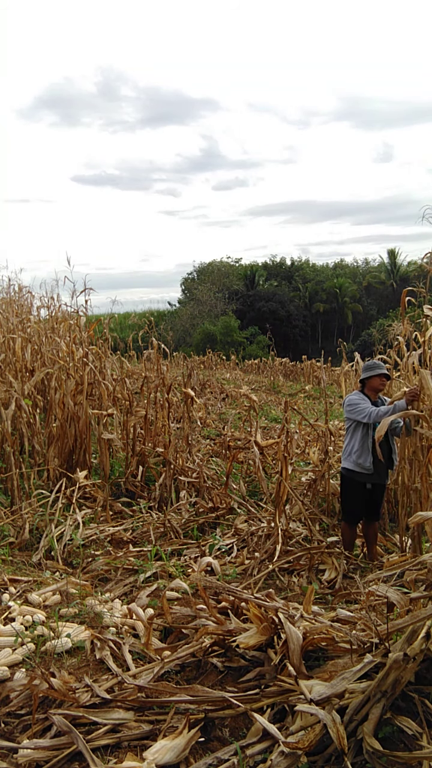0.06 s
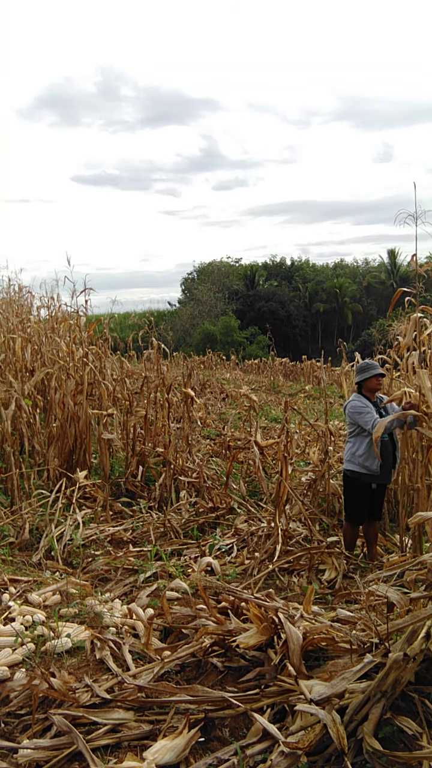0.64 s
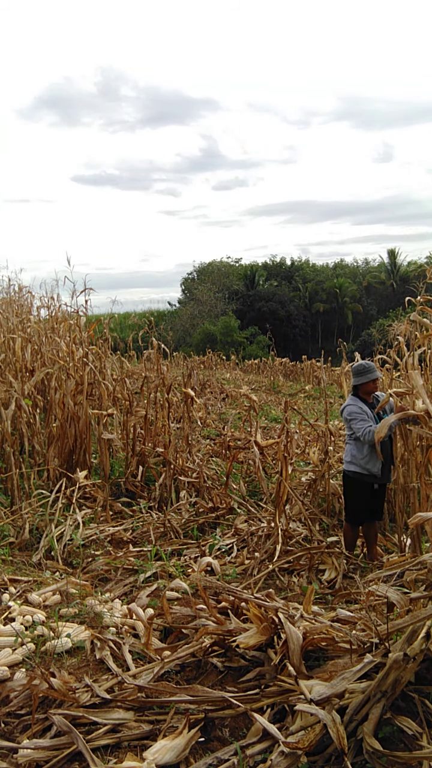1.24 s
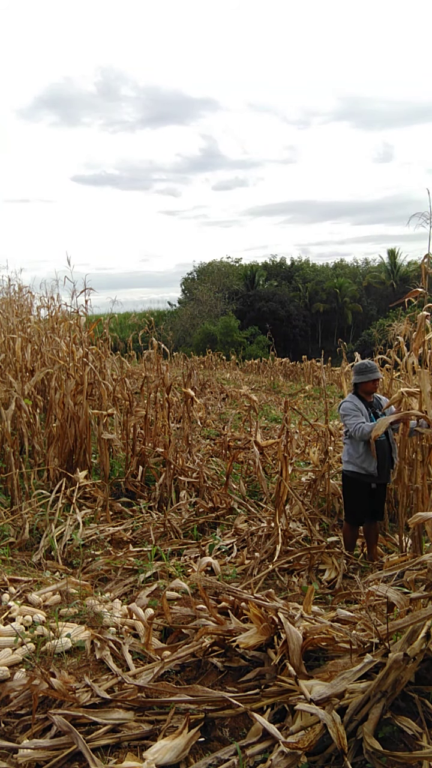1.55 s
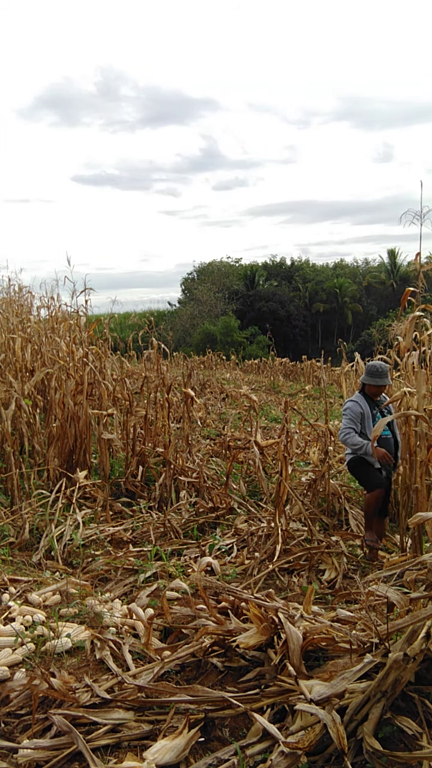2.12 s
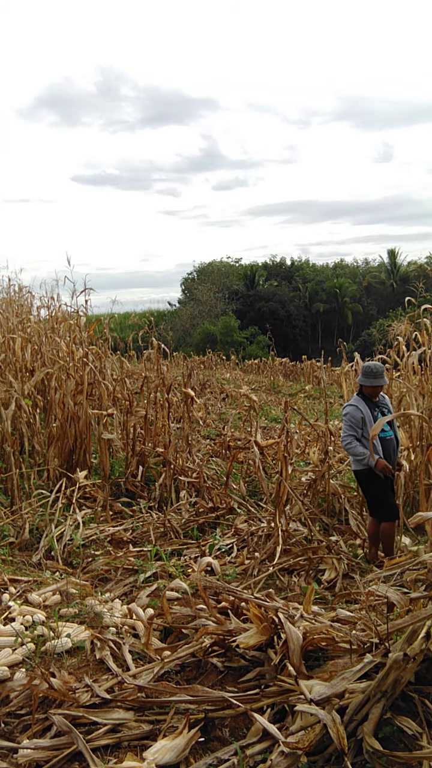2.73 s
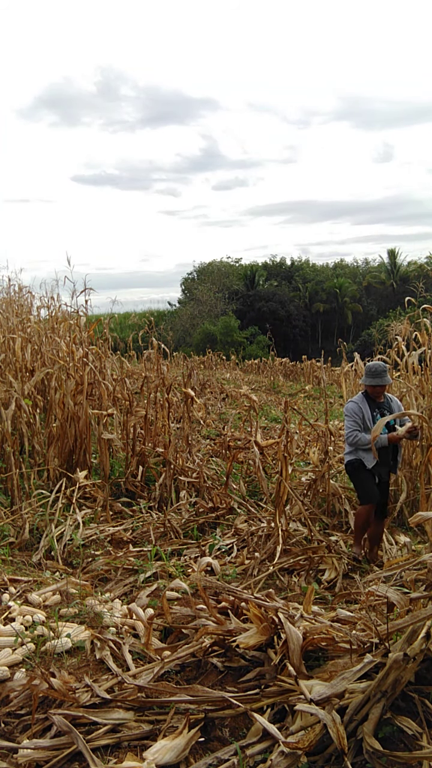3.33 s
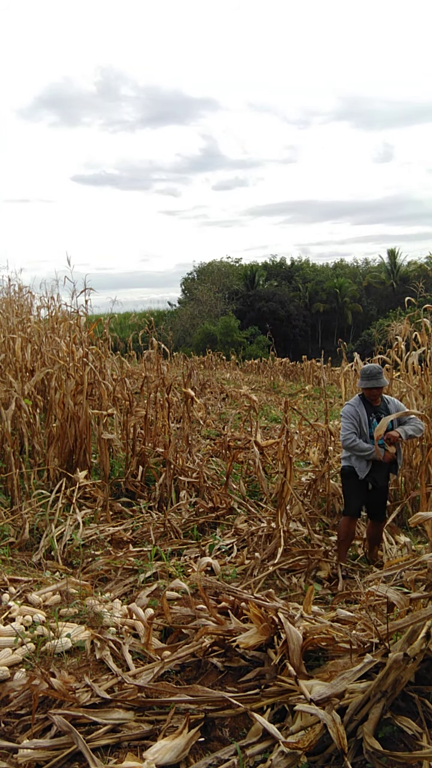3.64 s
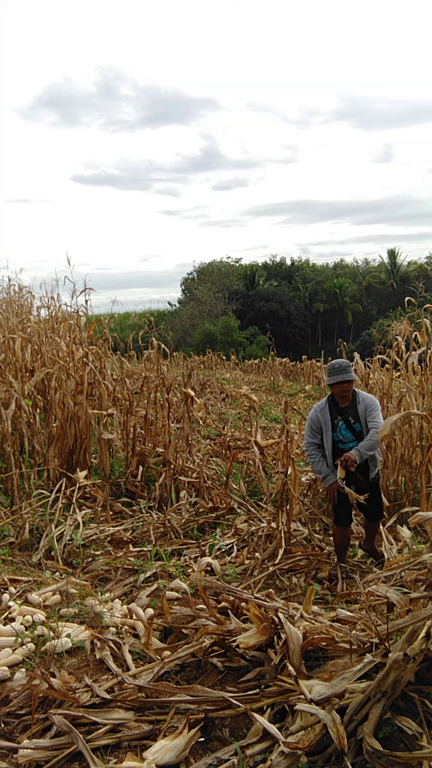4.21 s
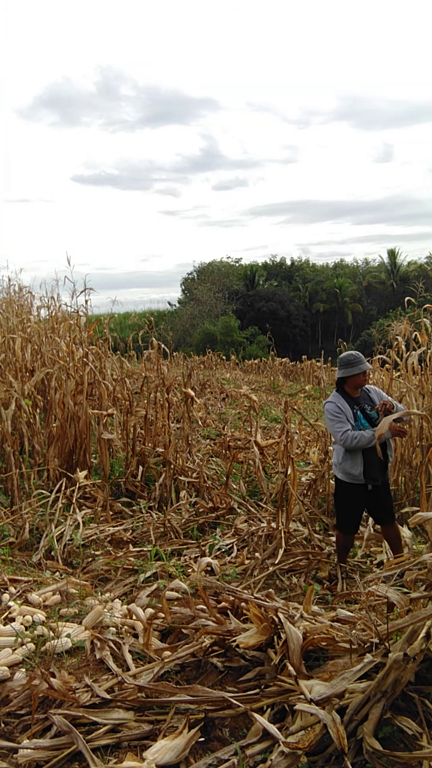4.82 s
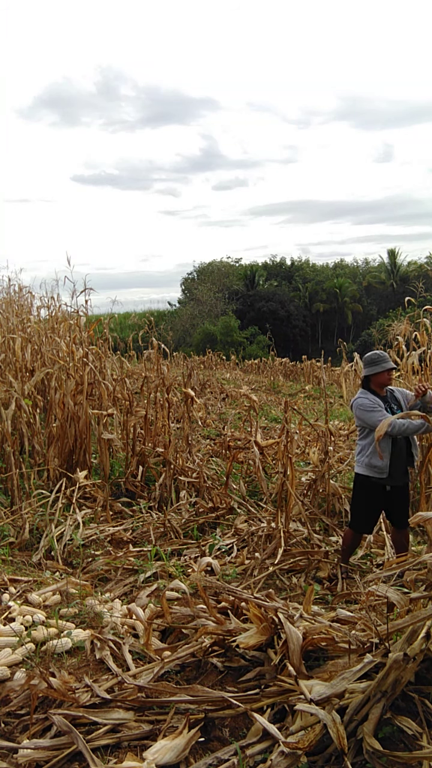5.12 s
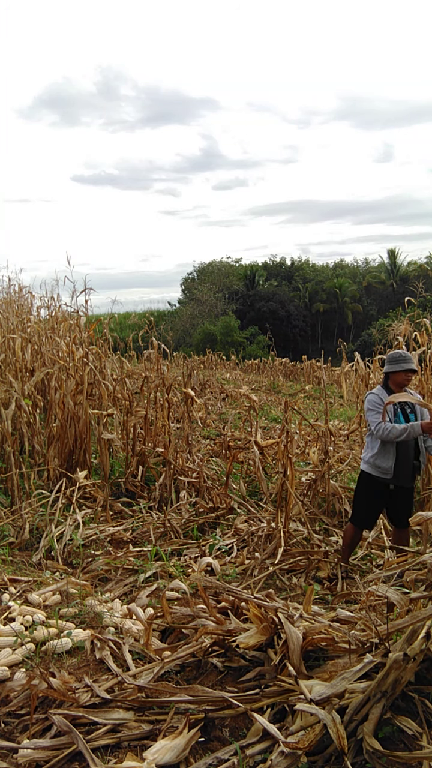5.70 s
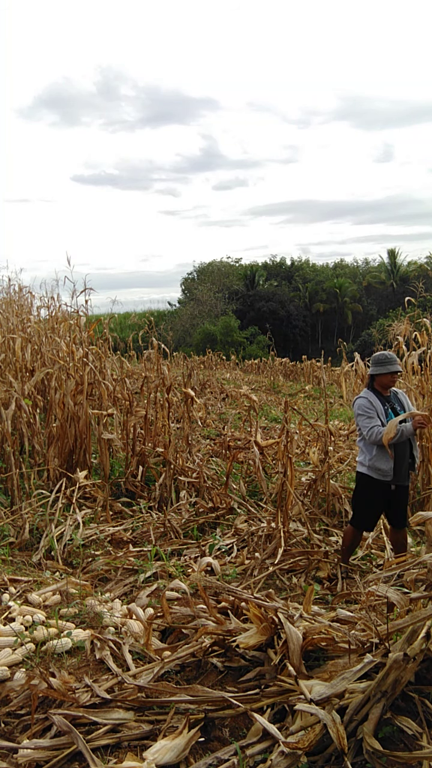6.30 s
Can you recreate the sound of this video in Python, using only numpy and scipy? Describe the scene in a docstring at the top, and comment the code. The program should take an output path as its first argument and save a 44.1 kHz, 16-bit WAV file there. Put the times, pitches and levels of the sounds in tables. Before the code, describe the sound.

Dry corn husks rustle and tear, an ear snaps off, and footsteps crunch over dead stalks while small birds chirp faintly.

```python
"""An open field of dry corn, where someone picks and husks: leaves rustle, husks tear, stalks snap
underfoot. Each movement is a shower of tiny fibre breaks, scattered by the standing crop; a stiff
shank knocks as an ear breaks off, and feet thud on the soil. Small birds chirp nearby and larger
ones call from far off, over faint insects and a low rumble of air."""
import sys
import numpy as np
from scipy import signal
from scipy.fft import rfft, irfft, next_fast_len
from scipy.io import wavfile
from scipy.ndimage import uniform_filter1d, map_coordinates

SR = 44100
rng = np.random.default_rng(int(sys.argv[2]) if len(sys.argv) > 2 else 0)


def output_pcm(signal):
    """Save a mono or channel-first signal as 16-bit PCM at the path in sys.argv[1].

    Samples are clipped to [-1, 1] before scaling.
    """
    pcm = np.clip(np.atleast_2d(signal).T, -1, 1) * 32767
    wavfile.write(sys.argv[1], SR, np.round(pcm).astype(np.int16))


N = 280035


def amp(db):
    """Decibels to gain."""
    return 10 ** (np.asarray(db) / 20)


def unit(x):
    """Normalise to rms 1."""
    return x / np.sqrt(np.mean(x ** 2) + 1e-20)


def along(points, hz):
    """Read a curve of (f/Hz, value) points on a log frequency axis."""
    f, values = np.transpose(points)
    return np.interp(np.log(hz + 1), np.log(f + 1), values)


def wobble(rate, size=N):
    """Smooth random modulation, with rate knots a second."""
    knots = rng.standard_normal(int(size * rate / SR) + 4)
    return map_coordinates(knots, [np.arange(size) * rate / SR])


def add(track, s, sound):
    """Mix a sound into a track at s seconds."""
    start = max(0, round(s * SR))
    track[start:start + len(sound)] += sound[:max(0, N - start)]


def coloured(x, spectrum, size=4096):
    """Minimum-phase EQ of the given shape that keeps the power of white noise."""
    cepstrum = irfft(np.log(amp(along(spectrum, np.fft.rfftfreq(size, 1 / SR)))))
    cepstrum[1:size // 2] *= 2
    cepstrum[size // 2 + 1:] = 0
    response = irfft(np.exp(rfft(cepstrum)))
    return signal.fftconvolve(x, response / np.linalg.norm(response))[:N]


def echo(x, decay, size=256):
    """Diffuse outdoor reverb; each quarter second of sound takes its own paths."""
    out = np.zeros(N)
    for start in range(0, N, SR // 4):
        hz, t, noise = signal.stft(rng.standard_normal(SR // 2), SR, nperseg=size)
        fade = amp(-60 * t / along(decay, hz)[:, None])
        tail = signal.istft(noise * fade, SR, nperseg=size)[1]
        response = unit(tail) / np.sqrt(len(tail))
        add(out, start / SR, signal.fftconvolve(x[start:start + SR // 4], response))
    return out


def air():
    """A steady bed of low rumbling air."""
    # tone of the air: f/Hz, relative level/dB
    rumble_eq = [(20, -29), (40, -15.5), (60, -2), (88, 1.5), (130, -8), (220, -18), (600, -8), (1500, -10),
                 (4000, -29), (15000, -31.5)]
    return amp(-77) * coloured(rng.standard_normal(N), rumble_eq)


def insects():
    """A thin, wavering chorus: high bands of noise on a slow tremolo."""
    # peaks and dips of the chorus: f/Hz, relative level/dB
    chorus_eq = [(2500, -35), (3300, -7), (4000, -23), (4800, -8), (5400, -29.5), (6400, -2.5),
                 (7100, -16.5), (7900, -18.5), (8900, -12), (10500, -42.5)]
    return amp(-70 + 1.5 * wobble(5)) * coloured(rng.standard_normal(N), chorus_eq)


def whistle(length, start_hz, middle_hz, end_hz, rough, blur_hz, fade_db=0):
    """One gliding bird note of rms 1; roughness smears its pitch over blur_hz."""
    size = int(length * SR)
    progress = np.linspace(0, 1, size)
    hz = np.polyval(np.polyfit([0, .5, 1], [start_hz, middle_hz, end_hz], 2), progress)
    carrier = np.exp(2j * np.pi * np.cumsum(hz) / SR)
    rasp = 1 + rough * (wobble(blur_hz, size) + 1j * wobble(blur_hz, size))
    swell = np.sqrt(np.abs(np.sin(np.pi * progress))) * amp(-fade_db * progress)
    return unit(swell * np.real(carrier * rasp))


def birds():
    """Clear near chirps, a hoarse repeated note and far calls, all answered by the tree line."""
    # small birds nearby: t/s, length/s, start f/Hz, end f/Hz, level/dB
    chirps = [(3.217, 0.031, 3860, 3700, -54), (3.283, 0.17, 4800, 6550, -60),
              (3.6, 0.026, 3530, 3643, -50), (3.899, 0.02, 2930, 3026, -52.5),
              (4.136, 0.02, 3810, 3630, -53.5), (4.438, 0.022, 2710, 3620, -50),
              (4.599, 0.0056, 3500, 3630, -47.5), (4.629, .068, 4960, 2870, -48.5),
              (5.291, 0.085, 3300, 3850, -56.5), (6.041, 0.098, 3520, 3830, -59),
              (6.272, 0.034, 3840, 3580, -61.5)]
    # straight glides of distant birds: t/s, length/s, start f/Hz, end f/Hz, level/dB, roughness
    far_calls = [(0.183, 0.017, 680, 710, -59, 0.84), (0.229, 0.18, 743, 701, -66.5, .8),
                 (0.356, .26, 706, 551.7, -70, 1), (.82, .074, 818, 830, -77, 0.35),
                 (1.15, 0.21, 643, 570, -67.5, 0.63), (1.73, 0.16, 813, 827, -79, 0.84),
                 (1.943, 0.4, 854, 801, -74, 1.7), (3.031, .13, 819, 784, -78, 0.83),
                 (3.071, 0.62, 1408, 1357, -71, 0.63), (3.952, 0.23, 1559, 1523, -69, 0.19),
                 (4.589, 0.15, 763, 723, -77.5, 0.53)]
    # reverb of the tree line: f/Hz, t60/s
    tree_decay = [(500, 0.25), (3500, 0.53), (8000, 0.052)]
    near, series, far = np.zeros((3, N))
    for s, length, start_hz, end_hz, db in chirps:
        middle_hz = start_hz + .67 * (end_hz - start_hz)  # the glide starts fast and eases off
        add(near, s, amp(db) * whistle(length, start_hz, middle_hz, end_hz, rough=.4, blur_hz=550))
    first_s, gap_s, slowing_s = 3.979, .088, .0017
    for k in range(9):  # one bird repeats a rising note, slowing a little
        s = first_s + gap_s * k + slowing_s * k ** 2
        for delay in (0, .018):  # each note is a quick double stroke
            add(series, s + delay, amp(-61.5) * whistle(.018, 2150, 2500, 2800, rough=.8, blur_hz=700))
    for s, length, start_hz, end_hz, db, rough in far_calls:
        call = whistle(length, start_hz, (start_hz + end_hz) / 2, end_hz, rough, blur_hz=150, fade_db=6)
        add(far, s, amp(db) * call)
    send = amp(-10) * near + amp(-8) * series + amp(-4) * far
    return near + series + far + echo(send, tree_decay)


def ring(hz, t60):
    """A struck, damped mode radiates the velocity of its motion."""
    t = np.arange(SR // 8) / SR
    motion = np.sin(2 * np.pi * hz * t) * amp(-60 * t / t60) * (1 - np.exp(-2 * hz * t))
    return np.diff(motion, prepend=0) * SR / (2 * np.pi * hz)


def footsteps():
    """Feet meet the soil with a dull thud."""
    # footfalls: t/s, f/Hz, level/dB
    steps = [(2.888, 274, -35), (4.945, 264, -35), (4.959, 197, -33), (4.983, 144, -42)]
    out = np.zeros(N)
    for s, hz, db in steps:
        add(out, s, amp(db) * ring(hz, t60=.025))
    return out


def shank_knocks():
    """The stiff shank rings briefly as an ear is broken off."""
    # hits on the shank: t/s, level/dB
    blows = [(1.161, -37.5), (1.2039, -37), (1.3274, -11.5), (1.331, -25), (5.373, -30.5)]
    # modes of the shank: f/Hz, relative level/dB, t60/s
    modes = [(520, -23, .008), (1480, -8, .005), (1930, -3, .01), (3300, -4, .009)]
    out = np.zeros(N)
    for s, db in blows:
        add(out, s, sum(amp(db + mode_db) * ring(hz, t60) for hz, mode_db, t60 in modes))
    return out


def breaks(rate, spread_db, rub_db, size=N):
    """Fibre breaks of uneven size, about rate a second, over the hiss of rubbing; rms 1."""
    happens = rng.random(size) < rate / SR
    sizes = amp(spread_db * np.minimum(rng.standard_normal(size), 2)) * rng.choice([-1, 1], size)
    return unit(unit(happens * sizes) + amp(rub_db) * rng.standard_normal(size))


def surges(rate, life_s, steady):
    """One break sets off others: an envelope of sudden swells that die away; rms 1."""
    starts = (rng.random(N) < rate / SR) * np.minimum(rng.exponential(size=N), 3)
    power = signal.lfilter([1], [1, -np.exp(-1 / (life_s * SR))], starts)
    return unit(np.sqrt(power + steady))


def gesture(s, rise, hold, release_db_per_s):
    """Envelope of one movement: force builds, holds and dies away as the plants settle."""
    t = np.arange(N) / SR - s
    return np.clip(t / rise, 0, 1) * amp(-release_db_per_s * np.maximum(t - rise - hold, 0))


def rustle():
    """Hands and feet crush the plants: excitation for the fibre, leaf and stalk layers."""
    # hands and body sweep the leaves: t/s, rise/s, hold/s, level/dB, leaf over fibre/dB
    strokes = [(-0.009, 0.033, 0.037, -65, 3), (0.106, 0.069, 0.096, -53.5, -3.5),
               (0.325, 0.06, 0.043, -52.5, -3.5), (0.516, 0.023, 0.021, -56, -9),
               (0.762, 0.0082, 0.011, -63.5, -14.5), (0.825, 0.068, 0.055, -58, -10),
               (1.106, 0.13, 0.019, -52, -1.5), (1.294, 0.0034, 0.023, -47, -9.5),
               (1.462, 0.036, 0.035, -69, 6.5), (1.517, 0.027, 0.073, -53.5, -4.5),
               (1.629, 0.058, 0.02, -52.5, -9), (1.983, 0.11, 0.024, -56, -6.5),
               (2.94, 0.028, 0.27, -53, -9), (3.305, 0.052, 0.15, -60.5, -7),
               (3.574, 0.024, 0.11, -59, -2.5), (3.781, 0.017, 0.11, -56.5, -13),
               (4.073, 0.0097, 0.12, -60.5, -7.5), (4.237, 0.07, 0.042, -56, -8.5),
               (5.017, 0.014, 0.058, -57.5, -1), (5.144, 0.061, 0.013, -54.5, -2),
               (5.74, 0.12, 0.12, -56, -2), (6.113, 0.02, .01, -65, -15.5),
               (6.215, 0.013, 0.015, -68.5, -21)]
    # feet press the dry litter: t/s, hold/s, level/dB, leaf over fibre/dB, stalk over fibre/dB
    treads = [(2.453, 0.089, -40, -3, -15), (2.612, .1, -45.5, -9, -14.5), (2.798, 0.04, -38, -6.5, -16),
              (4.857, 0.068, -53, -6, -5), (5.358, 0.031, -49.5, -4.5, -12.5),
              (5.47, 0.026, -45.5, -4, -31), (5.588, 0.093, -44, -4, -17.5)]
    stroke_release, tread_release, stalk_release = 135, 118.5, 158  # dB/s; heavy stalks settle first
    tread_rise_s = .028
    power = np.zeros((3, N))
    for s, rise, hold, db, leaf_db in strokes:
        power[:2] += (amp([[db], [db + leaf_db]]) * gesture(s, rise, hold, stroke_release)) ** 2
    for s, hold, db, leaf_db, stalk_db in treads:
        power[:2] += (amp([[db], [db + leaf_db]]) * gesture(s, tread_rise_s, hold, tread_release)) ** 2
        power[2] += (amp(db + stalk_db) * gesture(s, tread_rise_s, hold, stalk_release)) ** 2
    # the standing stalk shakes as its ear is wrenched off
    power[2] += (amp(-58) * gesture(1.29, rise=.035, hold=.02, release_db_per_s=stalk_release)) ** 2
    fibre, leaf, stalk = np.sqrt(power)
    surge = surges(rate=130, life_s=.0025, steady=.4)
    crackle = breaks(rate=2000, spread_db=2.5, rub_db=-1.5)
    crumple = breaks(rate=1300, spread_db=3, rub_db=-1)
    crunch = breaks(rate=540, spread_db=3, rub_db=0)
    return surge * np.array([fibre * crackle, leaf * crumple, stalk * crunch])


def snaps():
    """A husk or stalk gives way: a hard crack and fading splinters excite fibre, leaf and stalk."""
    # husks tear in the hand: t/s, level/dB, leaf body over crack/dB, t60/s
    husk_tears = [(0.182, -52.5, 2, .1), (0.368, -49.5, -1, .08), (0.612, -53, -19, .02),
                  (0.841, -53, -21, .07), (1.161, -52.5, 0.5, .03), (1.2, -40.5, 0.5, .052),
                  (1.3, -50, 5, 0.18), (1.327, -33, -0.5, 0.045), (1.538, -49, -10, .04),
                  (2.091, -56.5, -0.5, 0.032), (3.768, -77.5, 21.5, 0.015), (3.8006, -33.5, -10, 0.08),
                  (3.8073, -57.5, -10.5, .045), (3.849, -59, -2, 0.031), (3.965, -49, -42, 0.042),
                  (6.155, -54.5, -11, .025)]
    # stalks snap underfoot: t/s, level/dB, leaf body over crack/dB, thud over leaf body/dB
    stalk_snaps = [(2.432, -70, 15, -4), (2.555, -45, -17, 1), (2.621, -33.5, 0.5, -9.5),
                   (2.634, -33, -1.5, -21), (2.691, -38, -2.5, -13.5), (2.706, -33, -12, -23),
                   (2.779, -43, -11, -4), (2.8003, -28.5, -11.5, -24), (2.832, -35, -1.5, -13.5),
                   (2.8692, -33, -39, -11), (4.863, -47, -8, -2), (4.872, -36.5, -6.5, -8.5),
                   (4.935, -41.5, 1.5, -22), (4.9587, -47, -2, -0.5), (5.033, -43, -6, -16.5),
                   (5.33, -48, 5.5, -27), (5.375, -39, 0.5, -29), (5.389, -39.5, -1.5, -32.5),
                   (5.481, -40.5, -2.5, -9), (5.59, -38, -2.5, -30.5), (5.694, -45, 0.5, -30),
                   (5.914, -50.5, 3, -11.5)]
    tear_thud_db, snap_t60_s = -38.5, .071
    events = [(*tear, tear_thud_db) for tear in husk_tears]
    events += [(s, db, body_db, snap_t60_s, thud_db) for s, db, body_db, thud_db in stalk_snaps]
    layers = np.zeros((3, N))
    t = np.arange(SR // 10) / SR
    transient = .65 * np.exp(-t / .00081)
    for s, crack_db, body_db, t60, thud_db in events:
        envelope = transient + amp(-60 * t / t60)
        for layer, db in zip(layers, np.cumsum([crack_db, body_db, thud_db])):
            burst = envelope * breaks(rate=5500, spread_db=-1.5, rub_db=-13, size=len(t))
            onset_rms = np.sqrt(np.mean(burst[:SR // 125] ** 2))  # first 8 ms
            add(layer, s, amp(db) * burst / onset_rms)
    return layers


def bending(x, depth_db, size=512):
    """Leaves bend as they are handled, so their resonances come and go."""
    bands = signal.stft(x, SR, nperseg=size)[2]
    ripple = uniform_filter1d(rng.standard_normal(bands.shape), size=3, axis=0)  # smooth in frequency
    drift = unit(uniform_filter1d(ripple, size=11, axis=1))  # and in time
    return signal.istft(bands * unit(amp(depth_db * drift)), SR, nperseg=size)[1][:N]


def corn_picking():
    """Rustle and snaps sound through the dry plants and scatter in the crop; knocks stay drier."""
    # bright crackle of fibre: f/Hz, relative level/dB
    fibre_eq = [(2500, -35), (4000, -8), (4900, -1), (5600, -5.5), (6500, 2.5), (7700, -1.5), (9000, -8),
                (10500, -12), (13500, -26), (15700, -19.5)]
    # midrange body of a leaf: f/Hz, relative level/dB
    leaf_eq = [(250, -52.5), (550, -16), (1000, -7.5), (1400, -5.5), (1950, -1.5), (2400, -5.5), (2800, -4),
               (3400, 1), (4000, -10.5), (5500, -47.5)]
    # low crunch of a stalk: f/Hz, relative level/dB
    stalk_eq = [(50, -33), (120, -11.5), (210, -0.5), (350, 1.5), (600, -1.5), (1000, -3.5), (2000, -23.5)]
    # scatter in the standing crop: f/Hz, t60/s
    crop_decay = [(200, 0.3), (2000, 0.6), (7000, 0.44), (14000, 0.38)]
    fibre, leaf, stalk = rustle() + snaps()
    plants = coloured(fibre, fibre_eq) + coloured(leaf, leaf_eq) + coloured(stalk, stalk_eq)
    plants = bending(plants, depth_db=2.5)
    knocks = shank_knocks() + footsteps()
    send = plants + amp(-9) * knocks
    return plants + knocks + amp(-10.5) * echo(send, crop_decay)


def scene():
    """Mono mix: the picker up front, with birds, air and insects behind."""
    return (corn_picking() + birds() + air() + insects())[None]


def suppressor(x, depth_db, size=512):
    """Soft multiband gate: each band is turned down while its power stays under the threshold."""
    # gate threshold: f/Hz, level/dB of an equally dense white noise
    gate_curve = [(100, -107.5), (400, -61), (1200, -51.5), (3000, -86.5), (4100, -57.5), (5000, -57),
                  (5900, -56.5), (6550, -26.5), (7200, -66.5), (8200, -60), (8950, -44), (9700, -71.5),
                  (13500, -82), (15500, -78)]
    hz, _, bands = signal.stft(x, SR, nperseg=size)
    power = np.abs(uniform_filter1d(np.abs(bands) ** 2, size=5, axis=-1))
    threshold = amp(along(gate_curve, hz))[:, None] ** 2 / size
    gain = np.maximum(power / (power + threshold), amp(depth_db))
    return signal.istft(bands * gain, SR, nperseg=size)[1][..., :N]


def record(dry):
    """A phone's noise suppressor ducks the quiet bands, and its band limit cuts the highest treble."""
    gated = suppressor(dry, depth_db=-15.5)
    size = next_fast_len(N + SR // 2)
    passband = np.fft.rfftfreq(size, 1 / SR) < 15900  # Hz
    return irfft(rfft(gated, size) * passband, size)[..., :N]


dry = scene()
out = record(dry)
output_pcm(out)
```